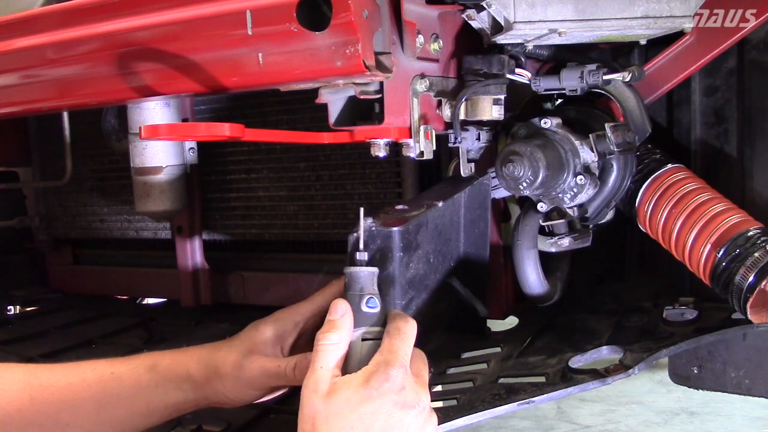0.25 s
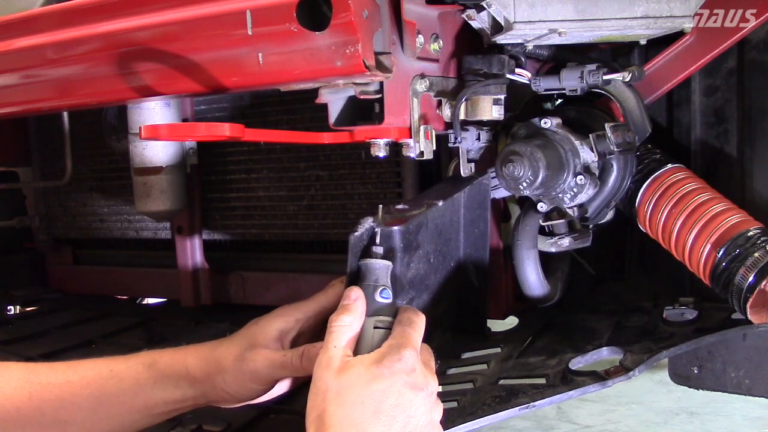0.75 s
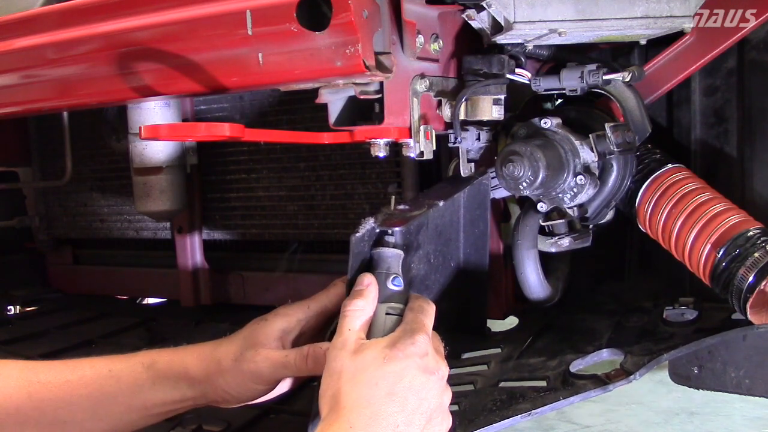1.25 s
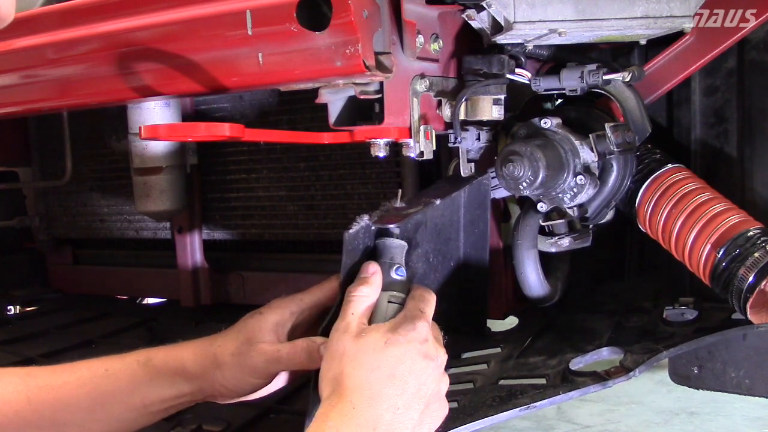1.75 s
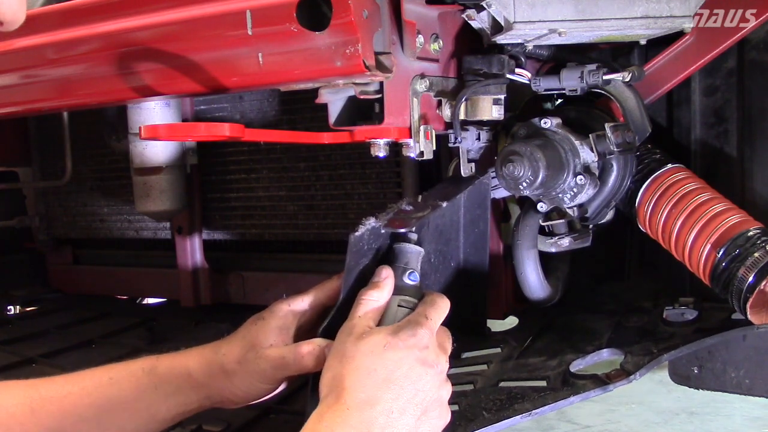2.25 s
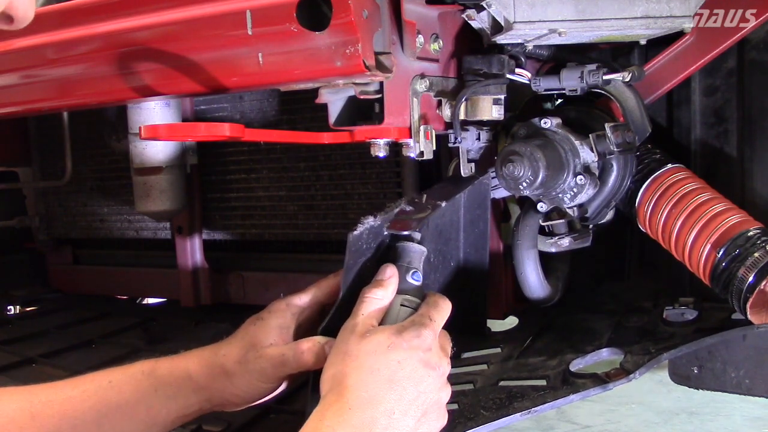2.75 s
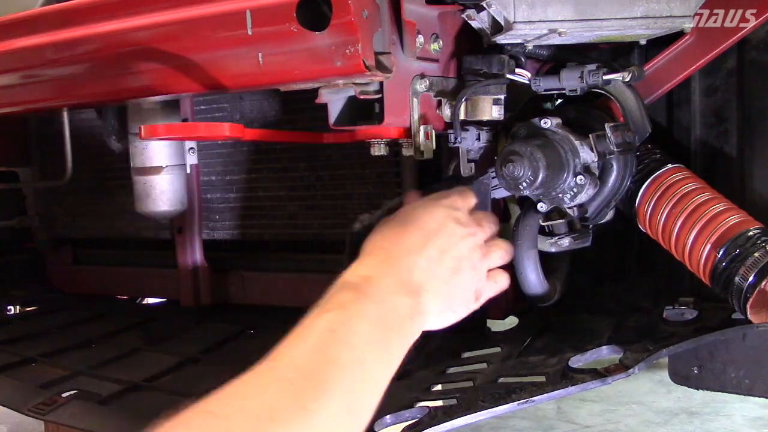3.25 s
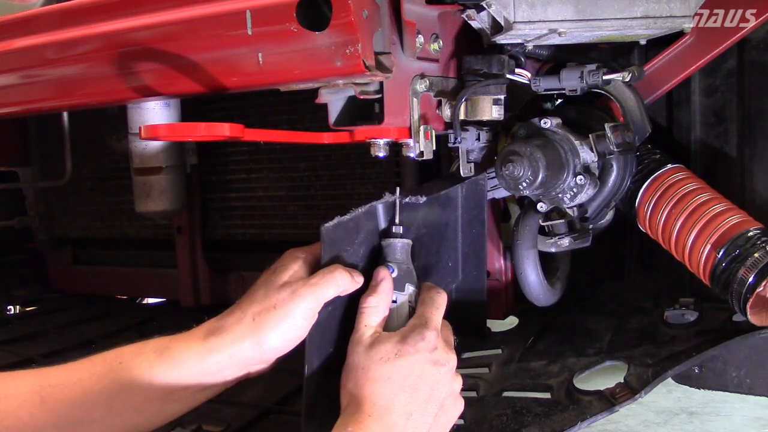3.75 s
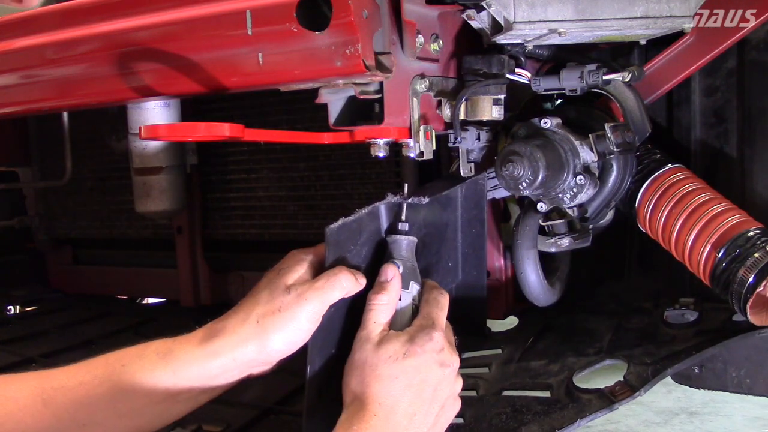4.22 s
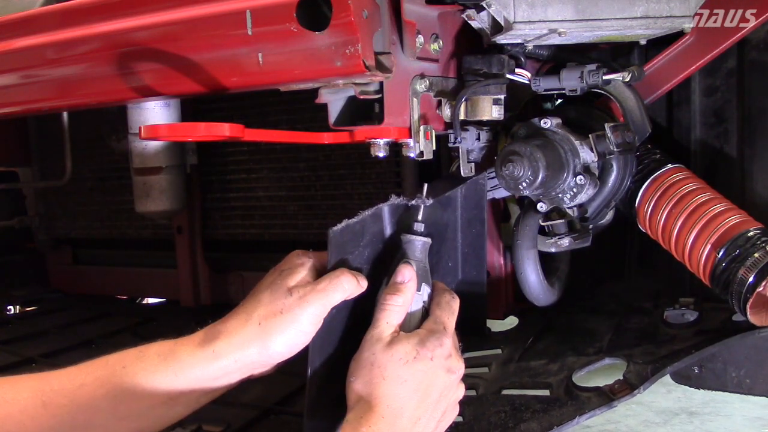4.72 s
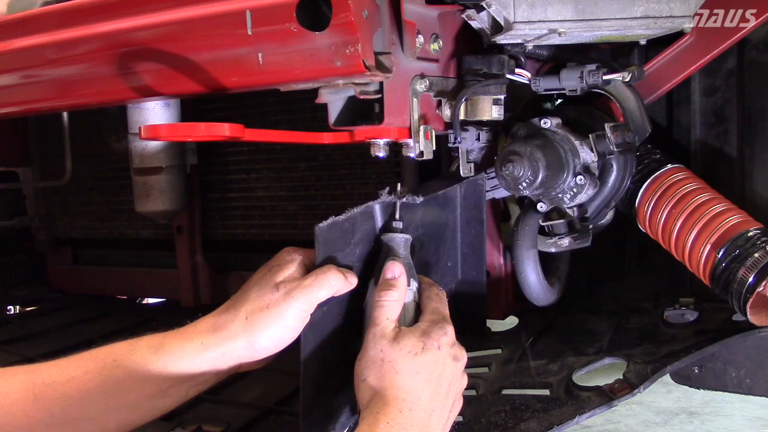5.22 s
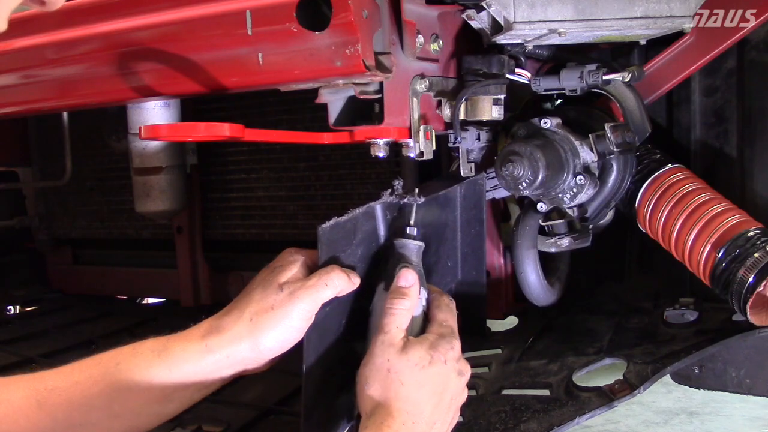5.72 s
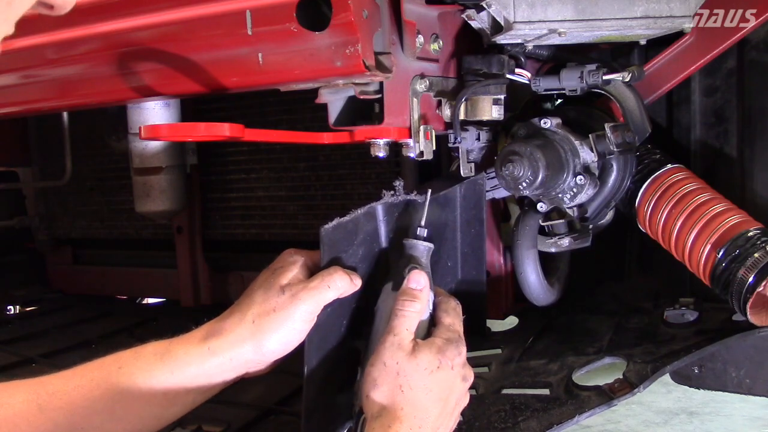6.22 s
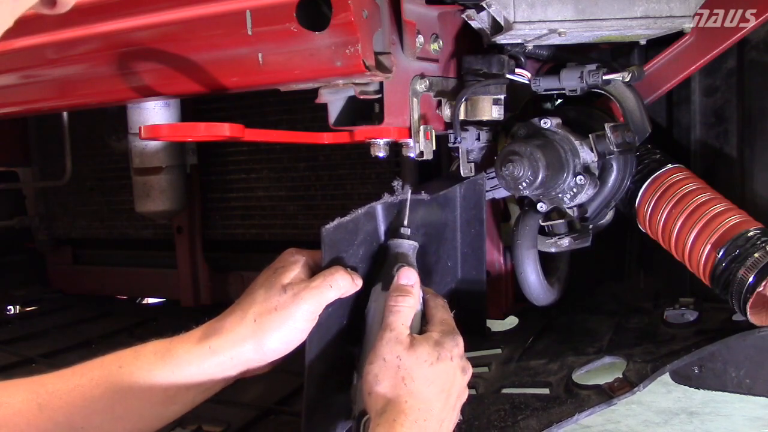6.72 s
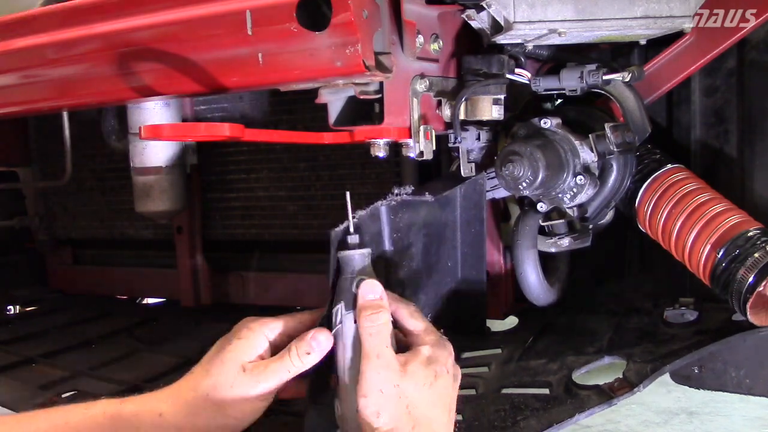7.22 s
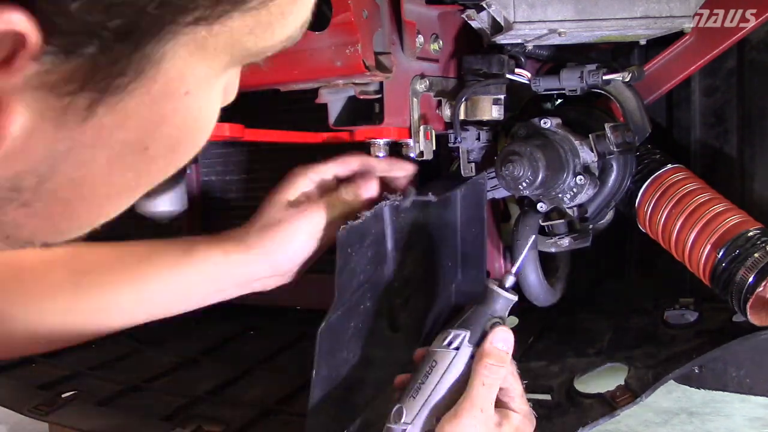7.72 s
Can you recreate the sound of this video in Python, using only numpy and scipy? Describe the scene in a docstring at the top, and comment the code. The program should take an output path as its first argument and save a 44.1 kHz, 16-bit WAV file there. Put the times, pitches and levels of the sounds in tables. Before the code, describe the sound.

Close to the microphone, a handheld rotary tool screams through plastic, sped up so everything is high and hurried. Its whine dips as the bit presses in and jumps as it lifts, amid rushing chip hiss. Near three seconds it runs free, switches off, then restarts with small knocks. Choppier cutting follows, ending in louder knocks and a strong shriek. A small garage answers faintly, almost mono.

```python
"""A handheld rotary tool cuts a plastic panel in a garage, played back about ten times fast, so all is high and quick.
Sines at multiples of the shaft speed make the whine; load sags it as the hand presses and lifts the bit.
Shaped noise makes the rush of chips and fan, bursts of grit the knocks; once the tool is switched off and restarted.
Mains hum and a far machine starting up, both sines, drone behind in soft noise for the garage air.
The tool is close to the microphones; the walls answer quietly and nearly alike at both."""
import sys
import numpy as np
from scipy import signal
from scipy.io import wavfile
from scipy.ndimage import uniform_filter1d, map_coordinates

SR = 44100
rng = np.random.default_rng(int(sys.argv[2]) if len(sys.argv) > 2 else 0)


def dump_mix(stems):
    """Bounce the given channels to the path in sys.argv[1] as a 16-bit WAV at rate SR."""
    frames = np.atleast_2d(stems).T  # one column per channel
    limited = np.clip(frames, -1, 1)  # hard clip at full scale
    pcm = np.round(limited * 32767).astype(np.int16)
    wavfile.write(sys.argv[1], SR, pcm)


def convert_level_to_amplitude(level_db):
    """Map a level in decibels to its linear amplitude factor."""
    exponent = np.asarray(level_db, float) / 20
    return 10 ** exponent


N = 351477

# mains hum, sped up with the rest: t/s, level/dB
HUM_LEVEL = [(0, -54), (1.4, -51), (1.5, -58.5), (2.4, -59.5), (2.7, -86), (3.37, -85), (3.4, -54),
             (3.7, -66)]
HUM_HZ = 1204
# a far machine runs up and stops: t/s, f/Hz of its fundamental, level/dB
FAR_MACHINE = [(3.94, 393, -74), (3.98, 412, -61), (4.06, 449, -54), (4.2, 431, -50.5),
               (4.45, 435.5, -57.5), (4.62, 417, -60)]
# its partials: multiple of the fundamental, relative level/dB
FAR_PARTIALS = [(2, -11), (3, -3), (4, 0)]
# the bit catches, panel and tool are knocked: t/s, panel ring peak level/dB, clatter gain/dB
KNOCKS = [(1.328, -42, -12.5), (1.438, -50, -34), (2.306, -31.5, -15.5), (2.754, -32, -15.5),
          (2.796, -36.5, -22), (3.214, -34, -22), (3.275, -40, -34), (3.297, -33, -29), (3.32, -33, -28.5),
          (3.375, -35.5, -34), (3.453, -36, -21), (3.561, -44, -31), (4.638, -36, -18), (4.823, -32.5, -20),
          (4.866, -33, -14.5), (4.918, -35.5, -25), (4.957, -44, -28), (5.281, -34, -20),
          (5.295, -42, -18.5), (5.338, -39, -27), (5.501, -53, -30), (5.585, -42, -27), (6.088, -31.5, -19),
          (6.278, -46, -30), (6.357, -41, -30), (7.17, -27, -24), (7.63, -24.5, -16), (7.832, -26, -23),]
# rings of the panel: f/Hz, relative level/dB, t60/s
PANEL_RINGS = [(1130, 18, 0.019), (1266, 28, 0.015), (2469, 18.5, 0.044), (3460, 4, 0.039)]
# shaft speed before chatter and catches shake it: t/s, f/Hz
SHAFT_SPEED = [(0.0, 3138), (0.115, 3056), (0.343, 3191), (0.4, 3052), (0.636, 2350), (0.885, 2308),
               (0.96, 2534), (1.12, 2099), (1.208, 2117), (1.232, 2287), (1.34, 2330), (1.385, 2644),
               (1.438, 2864), (1.45, 2760), (1.486, 2533), (1.52, 2787), (1.596, 3000), (1.636, 2850),
               (1.705, 2390), (1.848, 2270), (1.926, 2108), (2.048, 2530), (2.204, 2620), (2.269, 2472),
               (2.325, 2694), (2.525, 3010), (2.744, 2772), (2.8, 3095), (2.9, 3304), (3.013, 3363),
               (3.038, 4050), (3.133, 2090), (3.255, 687), (3.381, 699), (3.391, 2660), (3.472, 2960),
               (3.559, 3177), (3.614, 3137), (3.66, 2908), (3.72, 2828), (3.76, 2665), (3.905, 2600),
               (3.945, 2688), (4.071, 2501), (4.116, 2713), (4.225, 3045), (4.417, 2401), (4.617, 2237),
               (4.63, 2308), (4.665, 2478), (4.804, 2410), (4.875, 2800), (5.006, 2880), (5.082, 3015),
               (5.181, 2990), (5.266, 2710), (5.375, 2874), (5.473, 2790), (5.633, 3000), (5.735, 2920),
               (5.794, 3005), (5.864, 2900), (5.956, 2391), (6.089, 2443), (6.139, 2877), (6.181, 2998),
               (6.423, 3126), (6.692, 2860), (6.765, 3000), (6.839, 2955), (6.91, 3050), (6.969, 3094),
               (7.062, 2829), (7.179, 3078), (7.259, 2982), (7.361, 2610), (7.459, 2499), (7.5, 2560),
               (7.58, 3030), (7.7, 3206), (7.97, 3260)]
# pressure of the two flutes on the plastic, heard at twice the shaft speed: t/s, level/dB before body colour
FLUTE_PRESSURE = [(0.0, -21.5), (0.24, -23.5), (0.339, -30), (0.402, -18), (0.624, -28), (0.938, -18),
                  (1.048, -34), (1.13, -25.5), (1.36, -26.5), (1.42, -32), (1.49, -19), (1.53, -29),
                  (1.886, -30), (1.961, -25), (2.207, -33.5), (2.247, -20.5), (2.375, -31), (2.544, -20.5),
                  (2.729, -25.5), (3.42, -20.5), (3.6, -26), (3.637, -17), (4.023, -30), (4.073, -17.5),
                  (4.108, -28.5), (4.128, -17.5), (4.193, -33), (4.295, -16), (4.535, -35.5), (4.632, -23),
                  (4.719, -27.5), (4.976, -18.5), (5.063, -33), (5.113, -17.5), (5.143, -28),
                  (5.223, -16.5), (5.26, -27), (5.33, -20.5), (5.345, -19.5), (5.47, -18.5), (5.515, -31),
                  (5.525, -21), (5.769, -27), (5.819, -16), (5.914, -26), (6.081, -24), (6.2, -21.5),
                  (6.27, -28), (6.33, -36), (6.44, -25), (6.802, -23), (6.944, -17), (7.066, -21.5),
                  (7.49, -14.5), (7.94, -11), (7.972, -38)]
# the bit leaves the plastic: t/s, length/s
LIFTS = [(1.478, 0.0035), (1.504, 0.0072), (2.294, 0.0069), (2.753, 0.66), (3.441, 0.01), (3.462, 0.088),
         (3.572, 0.012), (3.904, 0.0074), (4.092, 0.009), (4.807, 0.011), (4.835, 0.01), (4.888, 0.0083),
         (4.946, 0.0081), (5.033, 0.008), (5.092, 0.0065), (5.127, 0.01), (5.308, 0.0092), (5.452, 0.0043),
         (5.487, 0.012), (5.561, .003), (5.581, 0.0047), (5.598, 0.023), (5.742, 0.028), (6.096, 0.077),
         (6.233, 0.025), (6.295, 0.032), (6.385, 0.05), (6.712, 0.039), (6.86, 0.05), (7.065, 0.059),
         (7.145, 0.026), (7.211, 0.024), (7.51, 0.0057), (7.527, 0.42)]
# the bit digs in hard for a moment: t/s, extra bite level/dB, time to die/s
DIGS = [(0.373, 4, 0.035), (1.439, 23.5, 0.0071), (1.581, 8.5, 0.089), (1.92, 9, 0.038),
        (4.213, 8.5, 0.041), (4.622, 13.5, 0.017), (5.534, 6.5, 0.034), (5.655, 6.5, 0.014),
        (6.274, 15, 0.016), (6.356, 10.5, 0.033), (7.172, 5, 0.053), (7.947, 6, 0.0072)]
# panel and housing favour some pitches, so each order swells as it glides through: f/Hz, gain/dB
BODY_GAIN = [(2100, -4), (2300, 4.5), (2500, -4.5), (2700, -8), (2900, -2), (3150, -7), (3350, 10.5),
             (3600, 11.5), (4000, 9.5), (4200, 1), (4900, 0), (5600, 2.5), (6000, 6.5), (6400, 0.5),
             (6900, 2), (7600, 5), (8600, -4.5), (9900, 0.5), (12400, 0), (16000, 3.5)]
# once-a-turn tone at a middling bite: t/s, level/dB before body colour
ONCE_A_TURN = [(0.0, -32.5), (0.352, -25.5), (1.1, -25), (1.427, -21), (1.856, -28.5), (1.93, -15.5),
               (2, -30.5), (2.15, -20), (2.342, -22.5), (2.447, -30.5), (2.714, -19.5), (3.472, -31),
               (3.624, -20), (3.931, -37.5), (4.173, -16.5), (4.33, -29), (4.505, -18.5), (4.772, -41.5),
               (4.86, -27), (5.181, -21.5), (5.4, -34.5), (5.672, -27.5), (6.109, -31.5), (6.193, -25.5),
               (6.677, -35.5), (6.924, -29), (7.2, -26.5), (7.36, -33), (7.97, -30)]
# third and higher orders at a middling bite: t/s, level/dB before body colour and order offsets
SHARPNESS = [(0.0, -17), (0.26, -19), (0.31, -28.5), (0.8, -23), (0.943, -31.5), (1.2, -29.5), (1.586, -21),
             (1.671, -35.5), (1.838, -20), (2.033, -32.5), (2.185, -24.5), (2.407, -29.5), (3.417, -25.5),
             (3.724, -32.5), (4.056, -25.5), (4.295, -29.5), (4.52, -17), (4.7, -24), (5.108, -29),
             (5.446, -25), (5.732, -32), (5.928, -26), (6.035, -35.5), (6.154, -26), (6.747, -29.5),
             (7.04, -21), (7.207, -21.5), (7.53, -34.5), (7.97, -34)]
# orders above the third: multiple of the shaft speed, relative level/dB
UPPER_ORDERS = [(4, -5), (5, -9), (6, -14)]
# the bearing whine peaks where it meets a ring of the housing: f/Hz, level/dB
WHINE_LEVEL = [(5300, -63), (7100, -39), (7650, -28.5), (8000, -33), (8300, -40), (8600, -65)]
# rush of chips and fan before bite, gusts and surges: t/s, level/dB
RUSH_LEVEL = [(0.0, -33), (0.3, -30.5), (0.818, -21.5), (0.95, -31.5), (1.464, -25.5), (1.534, -30),
              (2.155, -32.5), (3.015, -25.5), (3.405, -27.5), (3.58, -26.5), (3.694, -35.5), (4.23, -31.5),
              (4.385, -28.5), (4.6, -25.5), (4.662, -20), (4.7, -22), (4.79, -26.5), (5.248, -34.5),
              (5.313, -32), (6.127, -32), (6.465, -26), (6.71, -36), (7.154, -26.5), (7.26, -34),
              (7.55, -27), (7.97, -23)]
# colour of the rush before its tilt: f/Hz, relative level/dB per Hz
RUSH_COLOUR = [(60, -79), (700, -51.5), (1250, -9.5), (1600, -17.5), (2400, -6.5), (3600, -4), (5800, 1),
               (7400, 5.5), (11000, 8), (15800, 5)]

OFF_S, ON_S = 3.053, 3.39  # switched off and on again
COAST_DB_PER_S = 193  # the motor tones fade once the power is off
FREE_DB, FREE_ONCE_DB = -44.5, -38.5  # flute and once-a-turn tones of a free bit, before body colour
LAND_DB, LAND_S = -1, 0.015  # change of bite as the bit lands, and how fast that dies
LIFTED_UPPER_DB, TICK_DB = -5, 6  # change of the upper orders on a free bit; hiss flick on landing
# a deep cut drags the shaft slow and runs steady; a light, fast bit skips
STEADY_HZ, SKIPPING_HZ, SKIP_DB = 2350, 2800, 9
BEARING = 2.55  # multiple of the shaft speed at which the bearing whines, not a whole one
GRIND_DB, GRIND_SIDE_DB = -34, -41  # rough band, and one shaft order below, before skips and lifts dull them
RASP, RASP_DB = 0.11, -25  # the rush frays the flute tone by so many radians at this rush level
RATTLE, RATTLE_DEPTH = 0.17, 2.2  # share of the shaft speed; depth per radian of fray at full load


def curves(rows):
    """Columns of a table, one value a sample; far below hearing outside its span."""
    s, *columns = np.transpose(rows)
    t = np.arange(N) / SR
    return [np.interp(t, s, column, left=-300, right=-300) for column in columns]


def drift(hz):
    """Slow chance of unit spread, up to hz."""
    x = signal.sosfilt(signal.butter(2, hz, fs=SR, output="sos"), rng.standard_normal(N))
    return x / x.std()


def tone(hz, db, fuzz=0.):
    """A sine of rms level db along a pitch curve; fuzz (radians) shakes its phase and grows skirts."""
    turns = 2 * np.pi * (np.cumsum(hz) / SR + rng.random()) + fuzz * drift(226)
    return np.sqrt(2) * convert_level_to_amplitude(db) * np.sin(turns) * (hz < 15900)


def hiss(points, patchy_db, shaft_hz, tilt_db, crowd=0.38):
    """Unit-rms coloured noise whose patches sit on shaft orders, glide with the speed and crowd round whole orders."""
    hz = np.fft.rfftfreq(512, 1 / SR)[:, None]
    frames = np.arange(N // 128 + 5)
    at = np.minimum(frames * 128, N - 1)
    re, im, patches = rng.standard_normal((len(frames), 257, 3)).T
    patches = uniform_filter1d(uniform_filter1d(patches, size=3, axis=0), size=32, axis=1)
    # read the patches along shaft order instead of frequency
    order = np.minimum(hz / shaft_hz[at] * 30, 256)
    patches = map_coordinates(patches / patches.std(), [order, frames + 0 * order], order=1)
    patches = patches + crowd * np.cos(2 * np.pi * hz / shaft_hz[at])
    f, db = np.transpose(points)
    colour_db = np.interp(np.log(hz + 1), np.log(f), db)
    colour_db = colour_db + tilt_db[at] * np.log2(hz / 8000 + 0.34)
    spectrum = (re + 1j * im) * convert_level_to_amplitude(colour_db + patchy_db[at] * patches)
    x = signal.istft(spectrum, nperseg=512, noverlap=384)[1][:N]
    return x / x.std()


def walls(x, t60=0.059):
    """Two different sets of sparse reflections of random sign, decaying over t60 seconds."""
    taps = np.zeros((2, 6000))
    at = np.arange(60, 5980, 20) + rng.integers(0, 20, (2, 296))
    echoes = rng.choice([-1., 1.], at.shape) * convert_level_to_amplitude(-60 * at / SR / t60)
    np.put_along_axis(taps, at, echoes, 1)
    return signal.oaconvolve(x[None], taps / np.linalg.norm(taps[0]), axes=1)[:, :N]


def garage_air():
    """The still air of the garage: soft, patchy noise, fullest from about 1 to 3 kHz."""
    colour = [(300, -20), (550, -16), (1200, -2), (2500, -3.0), (16000, -31)]  # f/Hz, level/dB per Hz
    return convert_level_to_amplitude(-57.5) * hiss(colour, 2.5 * np.ones(N), 3000 * np.ones(N), np.zeros(N))


def mains_hum():
    """Mains hum: one steady pitch whose level wavers slowly."""
    return tone(HUM_HZ * np.ones(N), curves(HUM_LEVEL)[0] + 3.1 * drift(7.2))


def far_machine():
    """A machine far off: partials of one gliding pitch, each wavering in level."""
    hz, db = curves(FAR_MACHINE)
    return sum(tone(k * hz, db + part_db + 3.66 * drift(37.8)) for k, part_db in FAR_PARTIALS)


def knocks():
    """Each knock is a short burst of grit: it rings the panel and clatters in the treble."""
    t, out = np.arange(2500) / SR, np.zeros(N + 5000)
    ring = sum(convert_level_to_amplitude(db - 60 * t / t60) * np.sin(2 * np.pi * hz * t) for hz, db, t60 in PANEL_RINGS)
    bright = signal.butter(2, [1800, 9000], "band", fs=SR, output="sos")
    grits = rng.standard_normal((len(KNOCKS), 1200))
    for (s, ring_db, clatter_db), grit in zip(KNOCKS, grits):
        blow = np.convolve(ring, grit * np.exp(-t[:1200] / 0.0068))
        blow *= convert_level_to_amplitude(ring_db) / abs(blow).max()
        clatter = signal.sosfilt(bright, grit) * np.exp(-t[:1200] / 0.0072)
        blow[:1200] += convert_level_to_amplitude(clatter_db) * clatter
        out[round(s * SR):][:len(blow)] += blow
    return signal.sosfilt(signal.butter(4, 700, "high", fs=SR, output="sos"), out[:N])


def shaft():
    """Shaft speed: the rotor's inertia rounds the path between the points, levelling off at each peak and sag."""
    s, hz = np.transpose(SHAFT_SPEED)
    step, t = np.diff(s), np.arange(N) / SR
    rise = np.diff(hz) / step
    # harmonic mean of neighbouring slopes, zero where the direction turns
    slope = 2 * np.maximum(rise[1:] * rise[:-1], 0) / (rise[1:] + rise[:-1] + 1e-9)
    slope = np.pad(slope, 1)
    k = np.clip(np.searchsorted(s, t) - 1, 0, len(step) - 1)
    u = (t - s[k]) / step[k]
    bow = (1 - u) * (slope[k] - rise[k]) - u * (slope[k + 1] - rise[k])
    return hz[k] + step[k] * u * (rise[k] + (1 - u) * bow)


def body_db(hz):
    """Gain that panel and housing give a pitch."""
    return np.interp(hz, *np.transpose(BODY_GAIN))


def bit_contact():
    """How free the bit is (0 to 1), its landings (dying from 1), and its digs (dB)."""
    t = np.arange(N) / SR
    free = uniform_filter1d(sum(1. * (t > s) * (t < s + d) for s, d in LIFTS), size=170)
    landing = sum((t > s + d) * np.exp(-abs(t - s - d) / LAND_S) for s, d in LIFTS)
    dig_db = sum(db * (t > s) * np.exp(-abs(t - s) / d) for s, db, d in DIGS)
    return free, landing, uniform_filter1d(dig_db, size=100)


def shaken(hz, chatter, skip):
    """Sharp blows of a skipping bit shake the shaft speed, and each catch breaks the whine for a moment."""
    t = np.arange(N) / SR
    hz = hz * (1 + 0.00553 * chatter * skip * drift(42.9))
    jolt = sum((t > s) * np.exp(-abs(t - s) / 0.012) for s, *_ in KNOCKS)
    return hz * (1 + 0.03 * jolt * drift(200))


def break_db(skip):
    """Short drop-outs as the bit skips, a fresh set at each call."""
    return -SKIP_DB * skip * np.clip(drift(70) - 0.7, 0, 2)


def chip_rush(hz, rush_db, load, tilt_db):
    """Chips thrown off the cut and fan air: noise gliding with the shaft, flicked up briefly by flying chips."""
    chips = (rng.random(N) < 900 * load / SR) * convert_level_to_amplitude(1.66 * rng.exponential(1, N).clip(0, 4))
    crackle = 1 + 0.18 * signal.lfilter([1], [1, -0.97], chips)
    return convert_level_to_amplitude(rush_db) * crackle * hiss(RUSH_COLOUR, 1.36 + 4.33 * load, hz, tilt_db)


def motor_tones(hz, once_db, whine_db, coast_db, skip, free):
    """Once-a-turn tone, the bearing's rough grind, and its whine, swelling as the speed meets the housing's ring."""
    once_db = once_db + coast_db + 3.5 * skip * drift(37) + break_db(skip)
    motor = tone(hz, once_db, fuzz=0.097)
    for k, db in (BEARING, GRIND_DB), (BEARING - 1, GRIND_SIDE_DB):
        motor += tone(k * hz, db + coast_db - 14 * np.maximum(skip, free), fuzz=1.5)
    whine_db = whine_db + coast_db + 0.5 * free + 2.5 * drift(38)
    motor += tone(BEARING * hz, whine_db, fuzz=0.17)
    return np.clip(hz / 600 - 2, 0, 1) ** 2 * motor  # silent below 1200 Hz, full from 1800 Hz


def cutting_tones(hz, bite_db, third_db, upper, skip, fray, load):
    """Flute tone and higher orders flutter as the bit chatters; a rough cut's rattle hangs side tones on them."""
    cut = tone(2 * hz, bite_db + 3.5 * skip * drift(59) + break_db(skip), fuzz=0.0059 + fray)
    flutter_db = skip * (6 * drift(20) + 2.5 * drift(84))  # slow sway and quick flutter
    cut += tone(3 * hz, third_db + flutter_db + break_db(skip), fuzz=0.032 + 2.1 * fray)
    for k, db in upper:
        flutter_db = 2.5 * (drift(90) + drift(12))
        cut += tone(k * hz, db + flutter_db + break_db(skip), fuzz=k / 9)
    rattle = tone(RATTLE * hz, 0.44 * drift(60), fuzz=1.0)
    cut = cut * (1 + np.clip(RATTLE_DEPTH * fray * load, 0, 1) * rattle)
    # mains ripple beats with the shaft, clearest on a free bit
    return cut + tone(hz + HUM_HZ, -42 - 13.0 * load + drift(40))


def tool():
    """The rotary tool: pressure, lifts and shaft speed set the levels of cut, motor and rush together."""
    t, hz = np.arange(N) / SR, shaft()
    once_db, sharp_db, rush_db = (curves(rows)[0] for rows in (ONCE_A_TURN, SHARPNESS, RUSH_LEVEL))
    free, landing, dig_db = bit_contact()
    powered = (t < OFF_S) | (t > ON_S)
    coast_db = -COAST_DB_PER_S * (t - OFF_S) * (t > OFF_S) * (t < ON_S)
    fray = RASP * convert_level_to_amplitude(rush_db - RASP_DB)

    press_db = (1 - free) * (curves(FLUTE_PRESSURE)[0] + LAND_DB * landing + dig_db) + free * FREE_DB
    extra_db = press_db + 25  # above a middling bite
    bite_db = press_db + body_db(1.976 * hz)
    load = np.clip((bite_db + 48.5) / 25, 0, 1)
    once_db = (1 - free) * (once_db + 0.21 * extra_db) + free * FREE_ONCE_DB + body_db(0.98 * hz)
    sharp_db = sharp_db + 0.43 * extra_db + LIFTED_UPPER_DB * free
    third_db = sharp_db + body_db(3.063 * hz) - 3.0
    upper = [(k, sharp_db + db + body_db(k * hz)) for k, db in UPPER_ORDERS]
    whine_db = np.interp(BEARING * hz, *np.transpose(WHINE_LEVEL))

    chatter = np.clip((sharp_db + 32) / 16, 0.1, 1)
    skip = np.clip((hz - STEADY_HZ) / (SKIPPING_HZ - STEADY_HZ), 0.25, 1) * (1 - free)
    skip = skip * np.clip((-12 - bite_db) / 12, 0.35, 1)  # a firmly pressed bit holds still
    hz = shaken(hz, chatter, skip)

    tilt_db = 3.5 * np.log2(hz / 2800) - 2.52 * load  # the fan hisses higher when fast and free
    rush_db = rush_db + 0.011 * extra_db + 0.68 * dig_db + 0.42 * coast_db
    rush_db = rush_db + 2.5 * load * drift(62) + drift(26.0)  # gusts under load, and a slower surge
    rush_db = rush_db + TICK_DB * landing ** 3
    rush = chip_rush(hz, rush_db, load, tilt_db)
    motor = motor_tones(hz, once_db, whine_db, coast_db, skip, free)
    cut = cutting_tones(hz, bite_db, third_db, upper, skip, fray, load)
    return powered * cut + motor + rush


def scene():
    """Nearly mono: one set of reflections is alike at both microphones, a faint one has opposite signs for width."""
    near = garage_air() + mains_hum() + far_machine() + knocks() + tool()
    alike, opposed = walls(near)
    room = convert_level_to_amplitude(-13) * alike
    side = convert_level_to_amplitude(-29.5) * opposed
    return near + room + np.array([[1], [-1]]) * side


def band_limit(x):
    """A steep low-pass at the top of the band."""
    return signal.sosfilt(signal.butter(12, 15790, fs=SR, output="sos"), x)


def record(dry):
    """Soft, slightly lopsided overload that thumps low as the level jumps, then a small microphone input's bass cut."""
    ceiling = 1.2
    bent = ceiling * np.tanh(dry / ceiling)
    bent = bent + convert_level_to_amplitude(-44) * bent ** 2  # the square term makes it lopsided
    mix = signal.lfilter(*signal.butter(1, 110, "high", fs=SR), bent)
    return band_limit(mix)


dry = scene()
out = record(dry)
dump_mix(out)
```